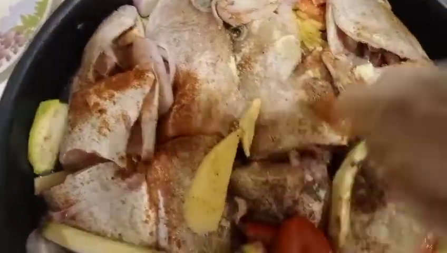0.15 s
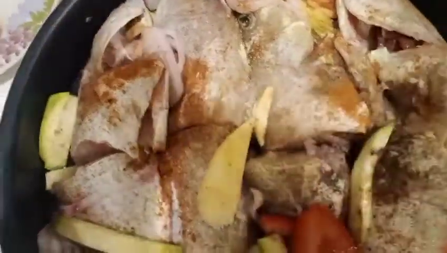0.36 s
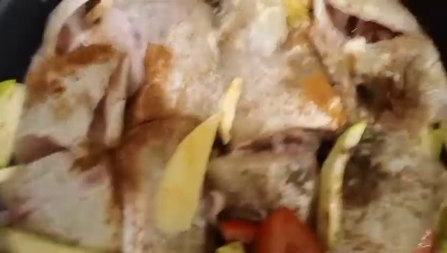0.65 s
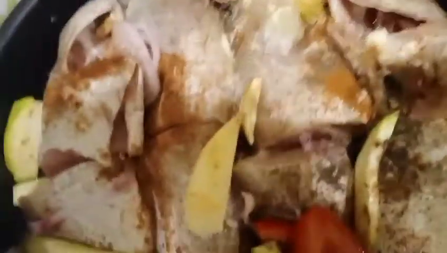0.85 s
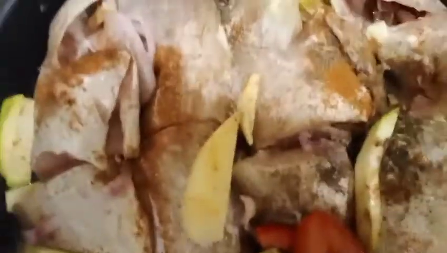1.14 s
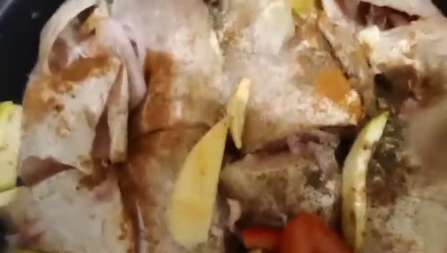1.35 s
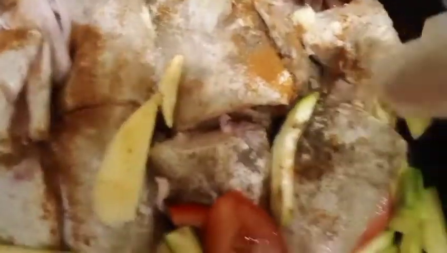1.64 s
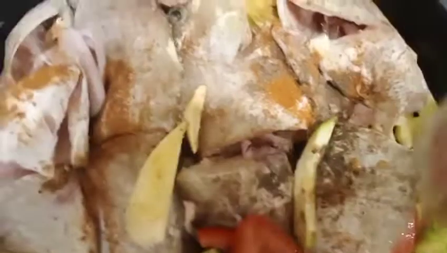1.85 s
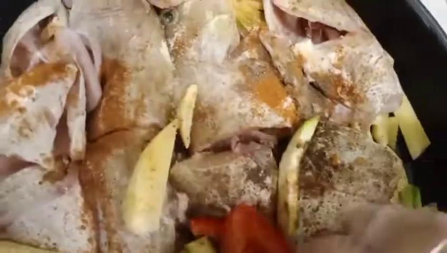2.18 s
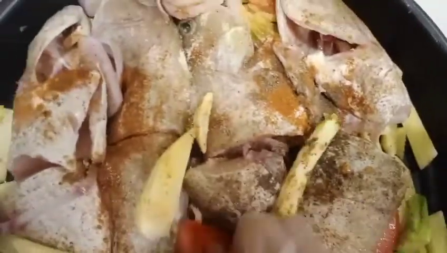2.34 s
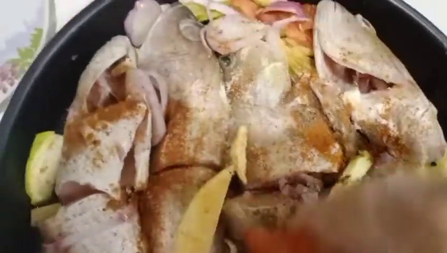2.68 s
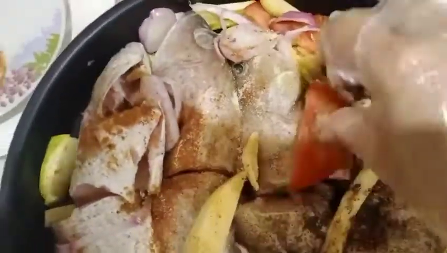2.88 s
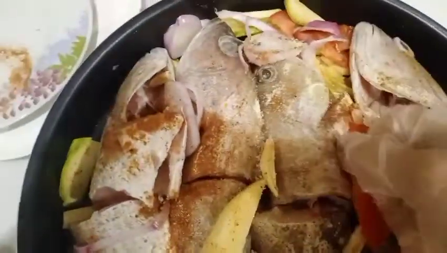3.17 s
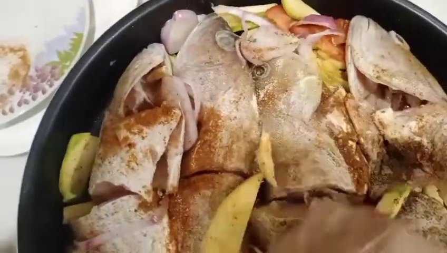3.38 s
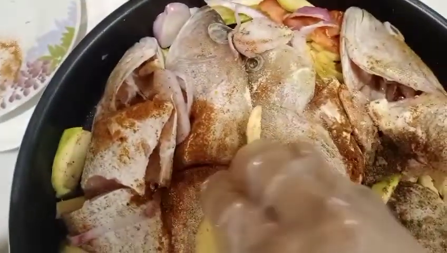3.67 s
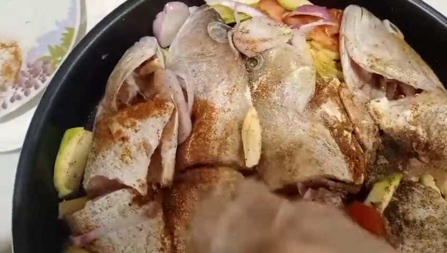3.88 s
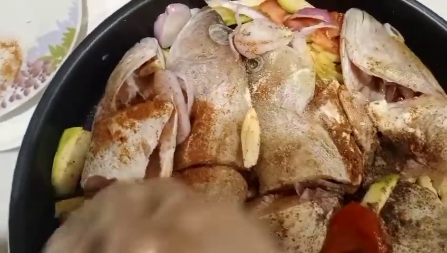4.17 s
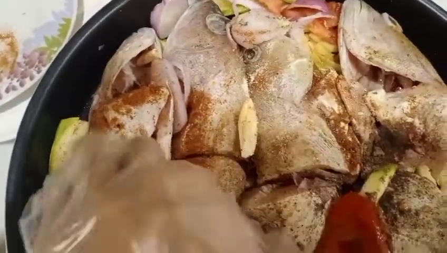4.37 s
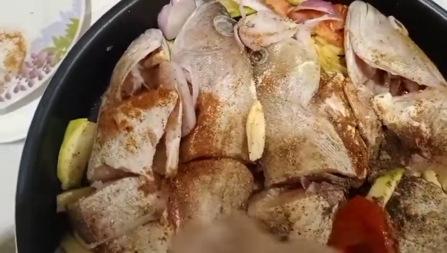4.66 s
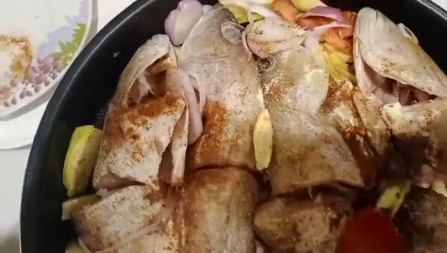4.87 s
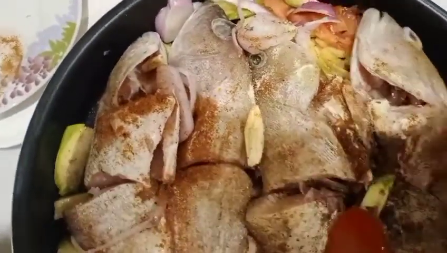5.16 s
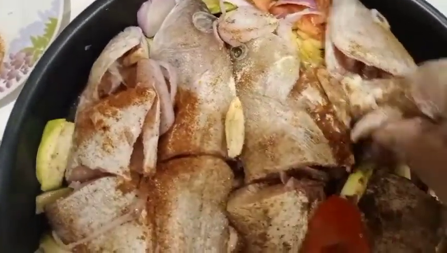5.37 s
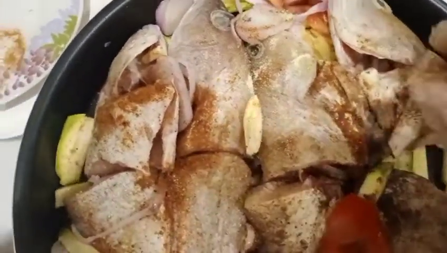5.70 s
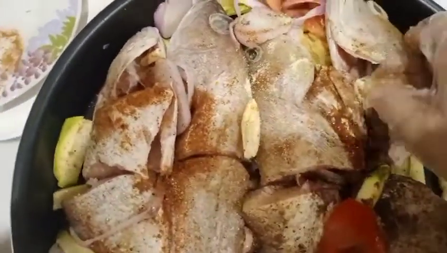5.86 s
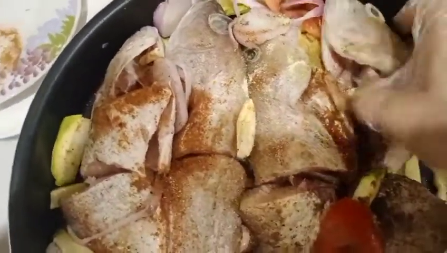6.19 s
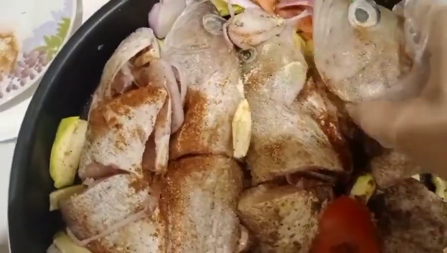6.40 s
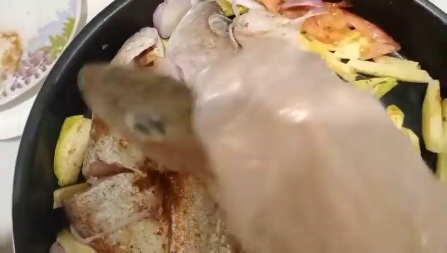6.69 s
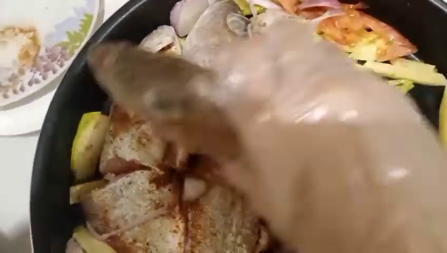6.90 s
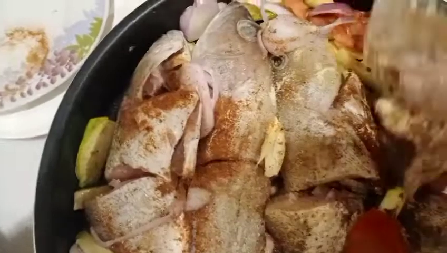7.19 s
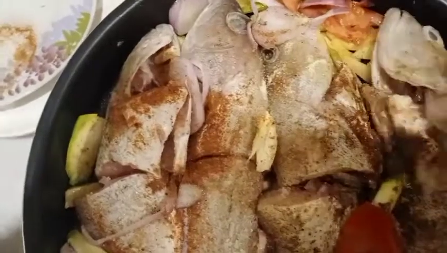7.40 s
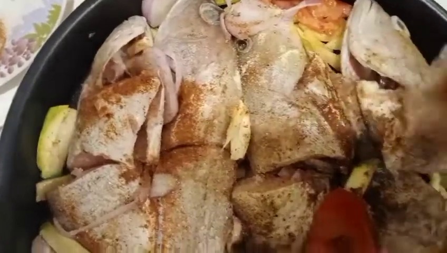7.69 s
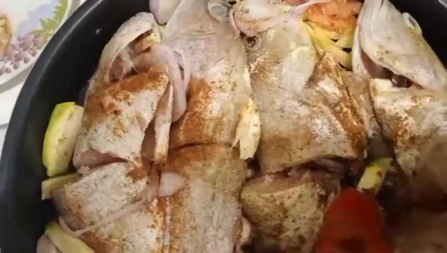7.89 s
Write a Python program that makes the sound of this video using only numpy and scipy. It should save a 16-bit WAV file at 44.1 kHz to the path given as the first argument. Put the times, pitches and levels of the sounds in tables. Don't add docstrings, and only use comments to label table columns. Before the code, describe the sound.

A thin plastic glove rustles and squeaks in strokes over wet raw fish, interrupted early by loud dull bumps of a hand shifting on the phone.

```python
import sys
import numpy as np
from scipy import signal
from scipy.fft import rfft, irfft, next_fast_len
from scipy.io import wavfile
from scipy.ndimage import uniform_filter1d

SR = 44100
rng = np.random.default_rng(int(sys.argv[2]) if len(sys.argv) > 2 else 0)


def decibels_to_gain(level_db):
    exponent = np.asarray(level_db, float) / 20
    return 10 ** exponent


def persist_wave(psi):
    counts = np.round(np.clip(psi, -1, 1) * 32767).astype(np.int16)
    wavfile.write(sys.argv[1], SR, np.atleast_2d(counts).T)


N = 354784

# [peak t/s, swell t/s, fade t/s, rustle level/dB, pressure level/dB: how far down the sound reaches]
RUBS = [(.21, .2, 0.066, -49, 0), (2.5, 0.23, .13, -52.5, -2.5), (2.78, .15, .15, -56, -2),
        (3.15, 0.15, .15, -56.5, -2.5), (3.59, .2, 0.1, -49.5, -0.5), (3.89, 0.11, 0.097, -56.5, -4.5),
        (4.02, 0.076, 0.076, -55, -10), (4.38, 0.11, .07, -56, -6.5), (4.515, 0.055, .05, -55.5, -1.5),
        (4.62, 0.046, .1, -67.5, -2), (5.12, 0.058, 0.083, -48, 0.5), (5.39, 0.053, .06, -61, -4.5),
        (5.64, 0.093, 0.026, -56, -4), (5.75, 0.05, 0.16, -55, -1), (6.08, 0.12, .06, -52, -4.5),
        (6.3, 0.095, .08, -47.5, -0.5), (6.44, 0.082, 0.088, -48, -0.5), (6.58, 0.16, .12, -51, -3.5),
        (6.7, .05, 0.11, -62, -9), (7.18, 0.052, 0.074, -49, -2), (7.41, 0.047, 0.02, -51, -1.5),
        (7.55, 0.25, 0.18, -52.5, -0.5), (7.68, 0.026, .06, -54.5, -10.5), (8.04, 0.067, .1, -50.5, -1.5)]
# [peak t/s, rustle level/dB, pressure level/dB]
FLICKS = [(0.0, -59, -3), (2.163, -41.5, 2), (2.31, -53.5, -3.5), (2.37, -54.5, 2.5), (2.685, -55, -13),
          (2.885, -52.5, -0.5), (2.98, -45, 0), (4.283, -55, -4), (4.775, -56, 1.5), (5.274, -62.5, -8),
          (5.679, -52, 0), (5.918, -47, -6), (5.96, -55, 0), (6.183, -45.5, 5), (6.838, -46.5, 1.5),
          (6.884, -60, -13.5), (7.275, -58, -10.5), (7.32, -60, -8), (7.84, -64, 4), (7.99, -53.5, -2.5),
          (6.447, -49, 5), (6.158, -47.5, -5), (4.8, -62.5, 1.5), (2.211, -56, -2.5), (3.038, -56.5, -1.5),
          (3.31, -64.5, -9), (5.03, -64, -12.5), (5.85, -59, -11.5), (3.69, -58, -8)]
# [peak t/s, swell t/s, fade t/s, rustle level/dB, weight level/dB: low over high rubbing]
SHIFTS = [(.695, 0.025, 0.023, -48.5, -0.5), (.79, .03, 0.12, -67, 23), (.9, 0.11, 0.13, -47, 1),
          (1.05, 0.036, 0.019, -48.5, -3), (1.09, 0.021, 0.024, -50.5, -3.5),
          (1.16, 0.054, 0.074, -40.5, 7), (1.3, 0.073, 0.082, -56.5, -7), (1.38, 0.18, 0.14, -48.5, 0.5),
          (1.56, 0.039, 0.09, -46.5, 7), (1.75, .1, 0.15, -52, -8.5), (1.83, 0.12, 0.031, -51, 8),
          (1.96, 0.092, 0.079, -58.5, 0)]
# [f/Hz, level/dB per Hz]
FILM_COLOUR = [(3600, -24.5), (4800, 4.5), (7100, 9), (8000, 3), (8700, -5), (9300, -13.5), (10300, -12),
               (11500, -22), (12200, -49)]
# [middle t/s, length t/s, f/Hz, level/dB]
STREAKS = [(0.164, .17, 2010, -67), (2.175, 0.06, 2150, -64), (2.188, 0.053, 1600, -67),
           (1.977, 0.31, 3200, -78), (6.205, 0.085, 2200, -59.5), (6.454, 0.06, 967, -64.5),
           (2.891, 0.019, 2300, -59), (7.201, 0.071, 2270, -68.5), (7.413, 0.075, 1220, -69.5),
           (3.558, 0.055, 2250, -71.5), (5.123, 0.085, 1740, -69), (5.782, 0.09, 1830, -69.5),
           (6.187, 0.09, 1565, -56.5), (6.191, 0.051, 860, -64), (6.348, 0.098, 1530, -67),
           (6.429, 0.093, 1318, -57), (6.675, .17, 2190, -70), (6.836, 0.031, 1780, -56.5),
           (7.536, 0.14, 1337, -65.5), (8.003, 0.057, 1950, -68)]
# [t/s, peak level/dB, f/Hz]
CASE_CLICKS = [(0.6625, -44.5, 2940), (0.6988, -31, 6850), (0.7675, -41, 6200), (0.7699, -25.5, 5770),
               (0.8364, -40, 4570), (0.852, -33, 2570), (0.912, -24, 5480), (1.0263, -31.5, 3024),
               (1.134, -34.5, 6185), (1.1717, -20, 3355), (1.2135, -21.5, 3013), (1.266, -29.5, 7260),
               (1.299, -28, 2740), (1.3166, -26.5, 3960), (1.4117, -23, 3180), (1.4478, -28, 3820),
               (1.504, -33.5, 6670), (1.5215, -55, 3130), (1.5453, -25.5, 6660), (1.6497, -32.5, 5740),
               (1.673, -48.5, 3420), (1.7, -38, 3190), (1.7615, -32, 2820), (1.943, -34.5, 6800),
               (1.9874, -33, 6600)]
# [t/s, peak level/dB, f/Hz]
WET_POPS = [ (2.1503, -34, 3420), (2.158, -32, 7420), (2.8865, -36, 5930), (3.1793, -36, 7000),
            (4.7637, -38.5, 4000), (5.0894, -36, 6700), (5.2768, -44, 6800), (5.68, -44, 7330),
            (5.7292, -38.5, 4500), (6.1453, -38, 6600), (6.307, -33, 6330), (6.4344, -33, 7350),
            (6.4467, -30, 6660), (6.8332, -38.5, 6700), (7.1337, -38.5, 6940), (7.4817, -40, 7020),
            (7.5935, -35, 6550), (7.7886, -37.5, 6730)]
# [peak t/s, peak level/dB, f/Hz, sharp edge level/dB re peak]
KNOCKS = [(.572, -49, 110, -30), (.706, -30, 269, -21), (.8542, -14.5, 279, 0.5), (.9335, -35.5, 325, -4),
          (1.1386, -17.5, 440, -17.5), (1.1427, -29, 560, -8), (1.1519, -12.5, 293, -13.5),
          (1.1602, -11, 1020, -14), (1.1683, -14.5, 720, -4.5), (1.1726, -13.5, 1033, -9),
          (1.1901, -14.5, 586, -34.5), (1.2457, -12, 308, -25), (1.2765, -23, 490, -9),
          (1.3194, -22, 1000, -2), (1.3286, -25, 497, -20.5), (1.4028, -25.5, 909, -23),
          (1.413, -23, 1050, -4.5), (1.4178, -24, 1055, -2), (1.5252, -11, 960, -20),
          (1.553, -23, 300, -5.5), (1.5618, -23, 1150, 0), (1.5938, -29, 281, -8.5),
          (1.6713, -13, 305, -11), (1.71, -42, 970, -1.5), (1.7181, -31, 1010, -0.5),
          (1.729, -25.5, 1022, -24), (1.7381, -21, 974, -3), (1.7426, -33, 920, -8),
          (1.7877, -20, 620, -35), (1.9685, -26.5, 244, -5.5)]
# [peak t/s, peak level/dB, f/Hz, sharp edge level/dB re peak]
TAPS = [(.665, -35, 278, -2), (.6824, -24.5, 183, -29.5), (.6956, -27, 233, -1.5), (.805, -30.5, 493, -30),
        (1.177, -17.5, 1160, -11), (1.215, -22, 1030, -1.3), (1.3141, -24, 769, -4),
        (1.6516, -24, 1190, -30), (1.7009, -30, 1090, -2), (1.7334, -26, 1250, -8), (1.9178, -28, 467, -50)]
# [f/Hz, level/dB per Hz]
HUM_COLOUR = [(25, -13), (60, -23.5), (130, 2.5), (220, -1.5), (320, 0.5), (400, -9.5), (1500, -9.5),
              (3300, -16), (4000, -23.5), (7400, -26.5), (7700, -17), (8200, -13.5), (9000, -52.5),
              (15600, -35.5)]
# [peak t/s, level/dB]
THROBS = [
    (4.349, -67),
    (5.162, -61.5),
    (6.02, -63.5),
    (6.95, -65),
    (7.42, -70.5),
    (7.879, -67.5),
]

FLICK_SWELL_S, FLICK_FADE_S = 0.018, 0.049
EDGE_DROP_DB, EDGE_CURVE = 18.5, 1.8
TAIL_DB, TAIL_S = -26.5, 0.057
MIDDLE_DB, BODY_DB, AIR_DB = -5.5, -9, -14
BODY_FOLLOWS, AIR_FOLLOWS = 1.7, .45
AIR_DAMPED = 0.17
AIR_HZ = 11800, 17000
SHIFT_MIDDLE_DB, SHIFT_BODY_DB, SHIFT_AIR_DB = -5, -4, -14
SLIDE_LOW_DB, SLIDE_HIGH_DB = 3.5, 1.5
KNOCK_CYCLES, TAP_CYCLES = 1.15, 1.7
HUM_DB, RUMBLE_DB = -68, -77
THROB_SWELL_S, THROB_FADE_S = .4, 0.067
SUPPRESSION_DB = 5.5


def glove():
    flicks = [(s, FLICK_SWELL_S, FLICK_FADE_S, db, pressure) for s, db, pressure in FLICKS]
    on_fish = movements(
        RUBS + flicks,
        lambda db, p: db,
        lambda db, p: db + MIDDLE_DB + p,
        lambda db, p: db + BODY_DB + BODY_FOLLOWS * p,
        lambda db, p: db + AIR_DB + AIR_FOLLOWS * (db + 51.5) - AIR_DAMPED * p)
    layer_db = np.array([[0], [SHIFT_MIDDLE_DB], [SHIFT_BODY_DB], [SHIFT_AIR_DB]])
    on_phone = movements(SHIFTS, lambda db, w: db) * decibels_to_gain(layer_db)
    buckles = grains(2500, spread_db=4.0, clump_db=5.5, clump_rate=44)
    hiss = rng.standard_normal(N) * decibels_to_gain(3.61 * drift(25))
    film = 1.2 * buckles + 1.1 * hiss
    patched = patchy(film, depth_db=5.0, width=2, length=8) + .3 * buckles + .4 * crinkles()
    airy = (film + .3 * buckles) * decibels_to_gain(3.5 * drift(14))
    crackly = film + .45 * grains(350, spread_db=10.5, clump_db=1.5, clump_rate=15)
    fish_layers = on_fish * film_layers(patched, airy)
    phone_layers = on_phone * film_layers(crackly, crackly)
    return np.sum(fish_layers + phone_layers, axis=0)


def film_layers(x, airy):
    rustle = coloured(x, FILM_COLOUR)
    layers = rustle, band(x, 2605, 4690), band(x, 1100, 3420), band(airy, *AIR_HZ, order=5)
    return [rms_one(layer) for layer in layers]


def crinkles():
    clicks = grains(170, spread_db=3.5, clump_db=4.5, clump_rate=13)
    dealt = rng.integers(0, 8, N)
    pitches = np.geomspace(3000, 7800, 8)
    return rms_one(sum(ring(clicks * (dealt == k), hz, 14.5 / hz) for k, hz in enumerate(pitches)))


def streaks():
    out = np.zeros(N)
    for s, length, hz, db in STREAKS:
        size = int(1.6 * length * SR)
        streak = band(rng.standard_normal(SR // 2), hz - 110, hz + 110)[-size:]
        uneven_db = 3.5 * np.repeat(rng.standard_normal(size // 600 + 1), 600)[:size]
        add(out, s - .8 * length, decibels_to_gain(db + 5.5) * rms_one(streak * decibels_to_gain(uneven_db)) * np.hanning(size))
    return out


def snaps():
    out, t = np.zeros(N), np.arange(400) / SR
    for rows, rise_s, ring_s in ((CASE_CLICKS, .00015, .0007), (WET_POPS, .0008, .0013)):
        noises = rng.standard_normal((len(rows), 400))
        shape = (1 - np.exp(-(t / rise_s) ** 2)) * np.exp(-t / ring_s)
        for (s, db, hz), noise in zip(rows, noises):
            pop = shape / shape.max() * (.6 * np.sin(2 * np.pi * hz * t) + 0.35 * noise)
            add(out, s + 0.00059 - rise_s, decibels_to_gain(db + 1.5) * band(pop, 0.86 * hz, 18000))
    return band(out, 2000, 8300, order=4) + decibels_to_gain(-8.5) * band(out, *AIR_HZ, order=4)


def grip():
    low_gain, high_gain = movements(
        SHIFTS,
        lambda db, w: db + SLIDE_LOW_DB + w,
        lambda db, w: db + SLIDE_HIGH_DB - w)
    low = rms_one(band(grains(1200, spread_db=8.0, clump_db=4.5, clump_rate=30), 130, 440))
    high = rms_one(band(grains(2500, spread_db=1.5, clump_db=5.5, clump_rate=19), 500, 1500))
    thud = rms_one(band(grains(300, spread_db=7.0, clump_db=2.5, clump_rate=20), 90, 220))
    return low_gain * (low + .45 * thud) + high_gain * high


def bumps():
    out = np.zeros(N)
    for rows, cycles in ((KNOCKS, KNOCK_CYCLES), (TAPS, TAP_CYCLES)):
        for s, db, hz, edge_db in rows:
            swing, lead = wavelet(hz, cycles)
            add(out, s - lead, decibels_to_gain(db) * swing)
            add(out, s - lead * 1.1, decibels_to_gain(db - 11.5) * wavelet(2.5 * hz, 1.8)[0])
            add(out, s - lead * 0.37, decibels_to_gain(db + edge_db - 3.0) * wavelet(3300, 0.95)[0])
            add(out, s - lead * 0.62, decibels_to_gain(db + edge_db) * wavelet(1200, 0.57)[0])
    return out


def kitchen():
    throb_rows = [(s, THROB_SWELL_S, THROB_FADE_S, db, 0) for s, db in THROBS]
    throb, = movements(throb_rows, lambda db, _: db)
    noise = patchy(rng.standard_normal(N), depth_db=2.5, width=1, length=12)
    hum = rms_one(coloured(noise, HUM_COLOUR)) * decibels_to_gain(HUM_DB + drift(11.0))
    drone = ring(rng.standard_normal(N), 120, 0.2)
    drone = drone + 0.39 * rms_one(band(rng.standard_normal(N), 40, 220))
    rumble = (throb + decibels_to_gain(RUMBLE_DB)) * decibels_to_gain(1.3 * drift(9)) * rms_one(drone)
    return hum * decibels_to_gain(SUPPRESSION_DB) + rumble


def swell(s, swell_s, fade_s):
    t = np.arange(0, N + 32, 32) / SR - s
    distance = np.abs(t / np.where(t < 0, swell_s, fade_s))
    top = decibels_to_gain(-2 * EDGE_DROP_DB * np.minimum(distance ** EDGE_CURVE, 6))
    return top + (t > 0) * decibels_to_gain(2 * TAIL_DB) * np.exp(-2 * np.abs(t) / TAIL_S)


def movements(rows, *laws_db):
    power = 0
    for s, up, down, db, column in rows:
        peaks = [decibels_to_gain(2 * law(db, column)) for law in laws_db]
        power = power + np.outer(peaks, swell(s, up, down))
    return np.array([np.interp(np.arange(N) / 32, np.arange(len(p)), np.sqrt(p)) for p in power])


def grains(per_s, spread_db, clump_db, clump_rate):
    sizes = decibels_to_gain(spread_db * np.minimum(rng.exponential(1, N), 5)) * rng.choice([-1, 1], N)
    born = rng.random(N) < per_s * decibels_to_gain(clump_db * drift(clump_rate)) / SR
    return rms_one(sizes * born)


def drift(rate):
    r = np.exp(-80 * np.pi * rate / SR)
    slow = signal.lfilter([1], [1, -2 * r, r * r], rng.standard_normal(N // 40 + 2002))[2000:]
    return np.interp(np.arange(N) / 40, np.arange(len(slow)), rms_one(slow))


def patchy(x, depth_db, width, length):
    frames = signal.stft(x, nperseg=512)[2]
    chance = rng.standard_normal(frames.shape)
    for size, axis in ((width, 0), (length, 1)):
        for _ in range(2):
            chance = uniform_filter1d(chance, size, axis=axis)
    return signal.istft(frames * decibels_to_gain(depth_db * rms_one(chance)), nperseg=512)[1][:N]


def coloured(x, spectrum):
    hz, db = np.transpose(spectrum)
    size = next_fast_len(N)
    grid = np.maximum(np.fft.rfftfreq(size, 1 / SR), 1)
    gain = decibels_to_gain(np.interp(np.log(grid), np.log(hz), db))
    return irfft(rfft(x, size) * gain, size)[:N]


def ring(x, hz, t60):
    r, w = decibels_to_gain(-60 / (t60 * SR)), 2 * np.pi * hz / SR
    return rms_one(signal.lfilter([0, np.sin(w)], [1, -2 * r * np.cos(w), r * r], x + 1e-18))


def wavelet(hz, width):
    damping = 3.4 / max(width, .5)
    cycles = np.arange(int(12 / damping * SR / hz)) * hz / SR - 2 / damping
    rise = cycles * damping / 2 + 1
    swing = rise ** 2 * np.exp(-damping * cycles) * np.cos(2 * np.pi * cycles)
    return swing, 2 / damping / hz


def band(x, low_hz, high_hz, order=2):
    edges = [low_hz, min(high_hz, .47 * SR)]
    return signal.sosfilt(signal.butter(order, edges, "band", fs=SR, output="sos"), x)


def rms_one(x):
    return x / np.sqrt(np.mean(x ** 2) + 1e-20)


def add(out, s, sound):
    i = round(s * SR)
    out[i:i + len(sound)] += sound[:N - i]


def scene():
    hand_on_phone = band(grip() + bumps(), 81, 9000, order=3)
    return (glove() + streaks() + snaps() + hand_on_phone + kitchen())[None]


def suppress(x, over, memory):
    frames = signal.stft(x, nperseg=512)[2]
    power = uniform_filter1d(np.abs(frames) ** 2, size=2, axis=0)
    smooth = signal.lfilter([1 - memory], [1, -memory], power)
    smooth = np.maximum(smooth, .35 * power)
    quiet = np.percentile(uniform_filter1d(power, size=12, axis=1), 10, axis=1, keepdims=True)
    gain = np.clip(1 - over * quiet / (smooth + 1e-18), decibels_to_gain(-SUPPRESSION_DB), 1)
    return signal.istft(frames * gain, nperseg=512)[1][:N]


def roll_off(x):
    return signal.sosfilt(signal.butter(12, 16840, fs=SR, output="sos"), x)


def record(dry):
    clean = suppress(dry[0], over=1.7, memory=.88)
    top_cut = signal.sosfilt(signal.cheby2(14, 30, 16050, fs=SR, output="sos"), clean)
    return roll_off(top_cut[None])


dry = scene()
out = record(dry)
persist_wave(out)
```